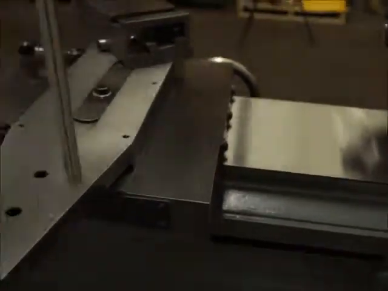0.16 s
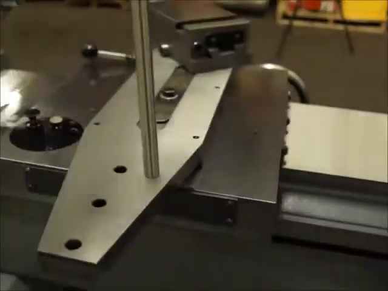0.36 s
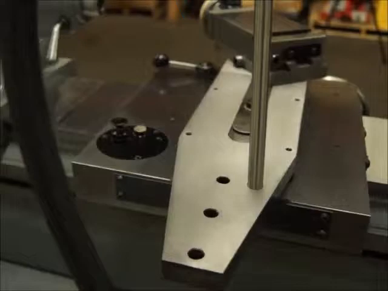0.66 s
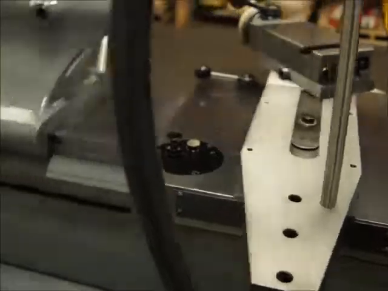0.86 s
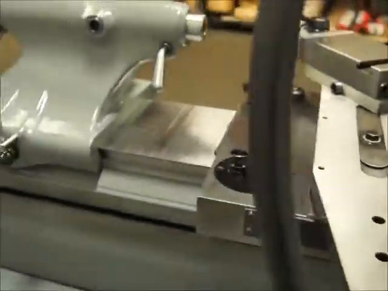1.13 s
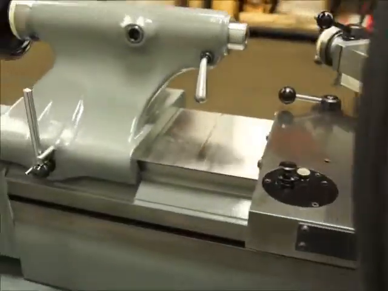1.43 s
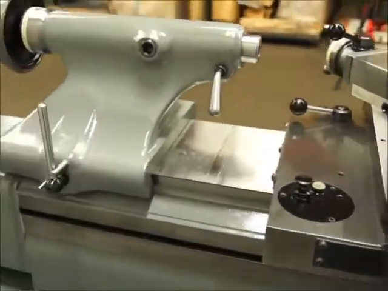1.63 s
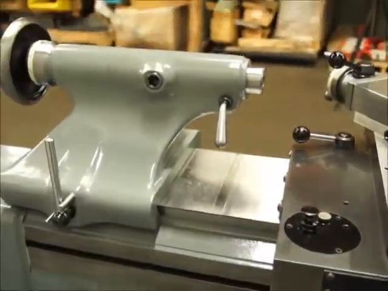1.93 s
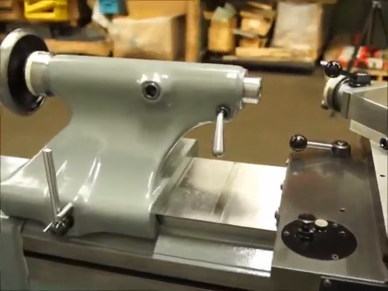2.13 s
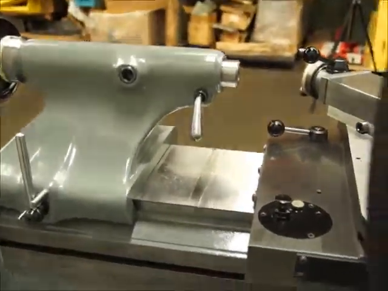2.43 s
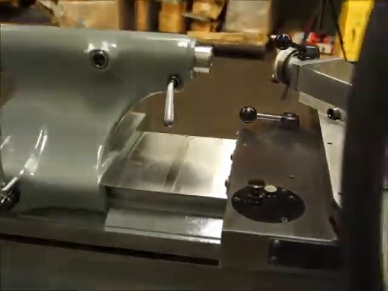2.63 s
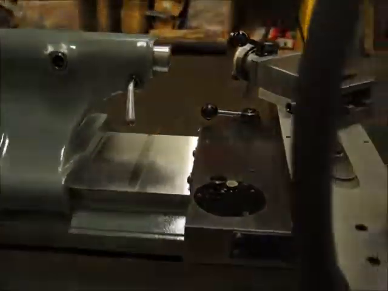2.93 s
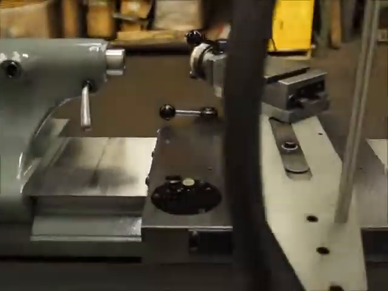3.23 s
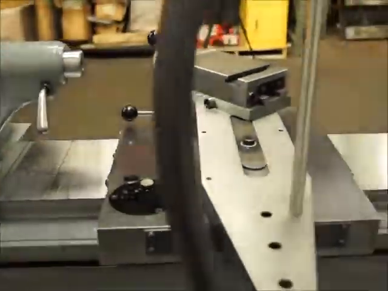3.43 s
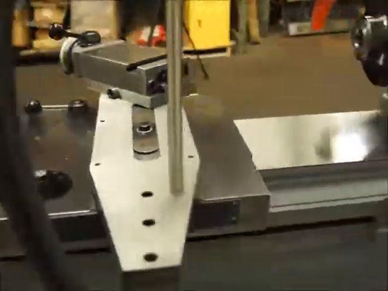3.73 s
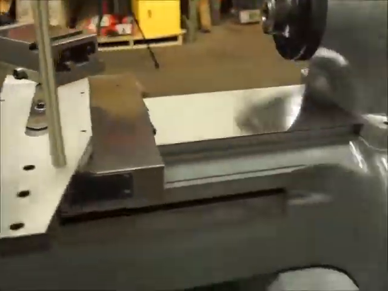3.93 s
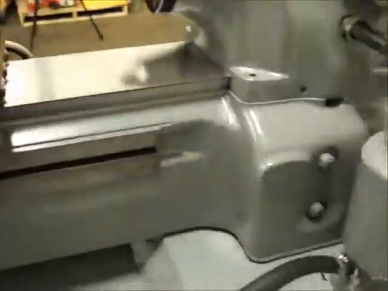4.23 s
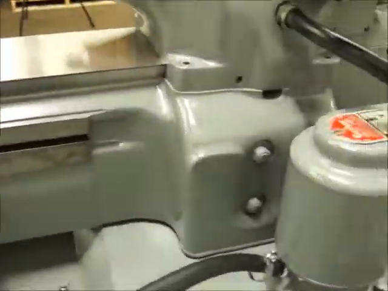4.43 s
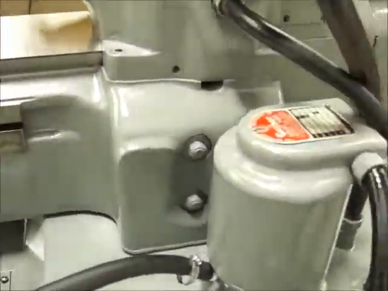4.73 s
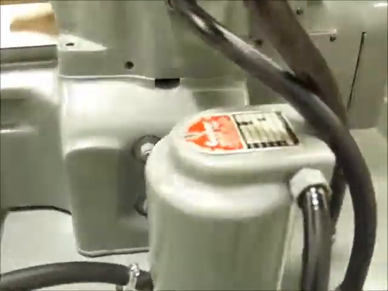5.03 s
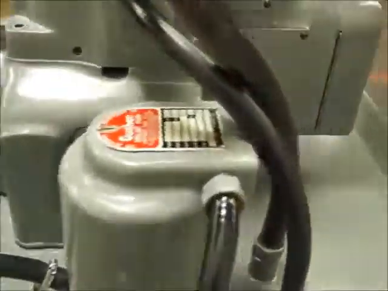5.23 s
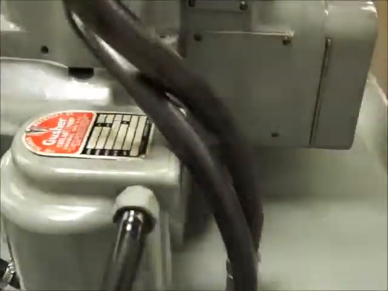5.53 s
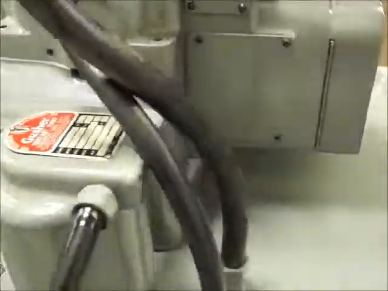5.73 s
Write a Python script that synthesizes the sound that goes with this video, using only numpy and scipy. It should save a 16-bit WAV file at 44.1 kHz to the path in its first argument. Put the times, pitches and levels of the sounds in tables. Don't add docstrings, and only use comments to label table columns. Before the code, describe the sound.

A metalworking lathe idles throughout, already running at the start and never changing speed. Thousands of tiny gear and bearing knocks fuse into a coarse, nasal whir centred near 1 kHz, with thinner cover-plate ringing above and a muffled motor rumble between about 150 and 800 Hz. It pulses subtly at fifteen shaft turns a second, with soft ticks on many turns. Steel clanks are scattered at 0-1.5 s, with brief housing swells near 0 and 0.6 s. From 1.5 to 3 s it is steadier and slightly quieter, with sharp clinks at 2.4 and 3.0 s and a faint high whine fading out. Clanks thicken from 3.6 s; around 4.5 s the level rises as the headstock nears, panels ringing briefly. From 5 to 5.9 s it is loudest and raspiest, with pump hum. The image leans right, then nearly centres. Short diffuse workshop reverberation; small camera microphone, treble cut above 11 kHz.

```python
import sys
import numpy as np
from scipy import signal
from scipy.fft import rfft, irfft, next_fast_len
from scipy.io import wavfile
from scipy.ndimage import uniform_filter1d, map_coordinates

SR = 44100
rng = np.random.default_rng(int(sys.argv[2]) if len(sys.argv) > 2 else 0)


def decibels_to_gain(level_db):
    exponent = np.asarray(level_db, float) / 20
    return 10 ** exponent


def dump_mix(stems):
    frames = np.atleast_2d(stems).T
    limited = np.clip(frames, -1, 1)
    pcm = np.round(limited * 32767).astype(np.int16)
    wavfile.write(sys.argv[1], SR, pcm)


N = 258867
SIZE = next_fast_len(N + SR)
HZ = np.maximum(np.fft.rfftfreq(SIZE, 1 / SR), 1)
T = np.arange(N) / SR

# [t/s, level of the lathe/dB, left minus right/dB]
CAMERA_PATH = [(0, -28.5, -4.5), (.3, -28, -4), (.45, -29.5, -4.5), (.6, -27, -4.2), (1.1, -28.5, -7),
               (1.8, -29.5, -4.5), (2.4, -28.5, -5), (2.75, -29, -4.5), (3.3, -29, -4), (3.62, -28, -3.5),
               (3.85, -28, -3.5), (4.2, -29, -2.5), (4.55, -25, -.8), (5.0, -26.5, -1), (5.4, -26, -1),
               (5.87, -24, -1)]
PLACE_S = [
    .9,
    3.2,
    4.5,
    5.15,
    5.75,
]
# [far level/dB, slope/dB per dB of approach, faced at t/s, faced for t/s, lift/dB]
PARTS = [
    (-35, 0.69, 0.11, 0.26, 5),
    (-32.5, 0.76, 4.33, .4, 1),
    (-33.5, 0.81, 5.77, 0.53, 2),
    (-42.5, 0.78, 0.12, 0.13, 1.5),
]
PART_HZ = [1000, 1600, 2900, 6000]
# [f/Hz, level/dB per Hz]
CASTING = [(260, -31), (450, -14.5), (890, -2.5), (1020, 1.5), (1150, -8), (1480, -8), (2040, -16.5),
           (2770, -15.5), (5640, -29), (6440, -25.5), (7170, -33), (8760, -33.5), (11000, -45),
           (14300, -110), (22000, -120)]
# [f/Hz, width/Hz, level
# over the casting/dB, place 0-4 aimed at, extra level there/dB]
LATHE_RINGS = [(873, 104, 2.1, 2.7, 6.5), (1013, 86, 8.5, 3.5, 6.5), (1218, 136, 1.7, 0.97, 4),
               (1364, 76, 4.5, .1, -5.5), (1400, 180, -3, 0.18, 6.5), (1510, 31, 3, 2.2, 4.5),
               (1664, 104, 0.5, 0.55, 2), (1818, 200, 0, 2.33, 6.5), (2130, 85, -0.4, 2.6, 6.5),
               (2398, 130, 3.5, 1.6, 2.5),
               (2620, 73, -0.5, 4.8, 6), (2742, 86, 2.5, 0.87, 3.5), (2980, 110, 1.9, 2.1, -2),
               (3395, 84, 3, 3.6, 5.5), (3850, 360, 2.1, 1.43, 3), (4480, 80, 3.2, 1.15, 8.5),
               (5180, 300, 4, 3.4, 6.5), (6340, 200, 5.5, 1.3, -3.5), (8370, 130, 4, 0.9, -5),
               (8540, 240, 4, 0.51, -3)]
# [f/Hz, level/dB per Hz]
RUMBLE = [(12, -58), (20, -50), (108, -18.5), (136, -13.5), (161, -10.5), (193, -10.5), (322, -3.5),
          (348, -1), (399, -5.5), (466, -2), (635, -4), (686, -6.5), (800, -4), (1040, -20), (1760, -120)]
# [multiple of the mesh rate, level/dB]
MESH = [(6, -48.5), (7, -68), (10, -45.5), (15, -46)]
# [f/Hz, level/dB]
HUM = [(73.6, -78), (105, -67.5), (168, -62.5), (242, -58), (335, -53.5), (475, -52.5)]
# [f/Hz, level/dB]
PUMP_HUM = [(73.6, -67.5), (560, -49)]
# [f/Hz, level/dB]
WHINE = [(4468, -53.5)]
# [f/Hz, level/dB per Hz]
PORTS = [(12, -46), (20, -18), (76, -6), (159, -1), (200, 9), (260, -30), (440, -120)]
# [t/s, peak level/dB, top minus peak/dB, body minus peak/dB]
CLANKS = [(0.021, -28, -4, -20), (0.2347, -27, -12, -1), (0.4367, -22, -14, -11), (0.535, -18.5, -16, -5.5),
          (1.0306, -21, -17, -17), (1.1523, -30, -17, -6), (1.4272, -18.5, -13.5, -10),
          (2.365, -15.5, -11.5, -26), (2.9691, -17, -27, -5), (3.191, -24, -22, -13),
          (3.293, -26, -24, -14), (3.6226, -23.5, -8.5, 0.5), (3.8927, -29, -9, 5.5),
          (3.967, -18, -27, -10), (4.018, -22.5, -13, -8), (4.157, -21, -14, -13), (4.4247, -26, -12, 4),
          (4.4912, -24, -11, -1), (4.557, -27, -12, -2), (4.8224, -29, -13, 1), (5.0958, -20, -16, -1.5),
          (5.2046, -27, -24, -5), (5.347, -17, -17, -11), (5.4144, -22, -14, -9), (5.4879, -18, -24, -12),
          (5.447, -24, -9, -4), (5.558, -19, -14, -8), (5.613, -19.5, -21, -7), (5.7536, -15, -23, -25)]
# [t/s, level/dB]
SURGES = [(.03, -26), (.12, -36), (.3, -35), (0.589, -24), (.65, -30), (1.91, -41), (2.21, -33),
          (2.43, -33), (2.68, -36), (2.89, -38), (3.11, -30.5), (3.371, -28.5), (3.47, -32), (3.61, -30.5),
          (3.74, -31), (4.04, -33), (4.67, -35), (4.76, -34.5), (4.84, -28.5), (4.95, -31), (5.25, -27),
          (5.31, -26.5), (5.405, -25.5), (5.5, -27), (5.62, -28), (5.69, -24), (5.765, -24), (5.787, -28.5),
          (5.83, -30.5)]
# [f/Hz, level/dB]
SHOP = [(60, -14), (250, -13.5), (600, -5.5), (880, -4), (1020, -10.5), (1200, -3), (2700, -5.5),
        (5000, -3.5), (10000, -1.5)]
# [t/s, for t/s, f/Hz, level/dB]
GLINTS = [(.95, .13, 4480, -47), (1.52, 0.17, 2404, -41.5), (3.62, 0.18, 2384, -38.5),
          (4.18, .1, 2950, -39), (4.3, .2, 1560, -33), (4.5, 0.15, 3310, -37), (4.55, 0.15, 2730, -37),
          (4.58, .22, 1760, -37), (5.25, 0.14, 2294, -37), (5.63, 0.18, 2620, -33), (5.7, 0.18, 803, -42)]

FAR_DB = -29
SHAFT_HZ, MESH_HZ = 15.0, 108.15
BEAM_PLACES = 0.73
SHADOW_S, SHADOW_FOR_S, SHADOW_DB = 4.5, 0.18, -2.5
RUMBLE_DB, PORTS_DB = -40.5, -66.5
TAP_START_S, TAP_HZ, TAP_SHARE = .034, 15.03, .6
TAP_DB, TAP_SCATTER_DB, TAP_TOP_DB, TAP_BODY_DB = -37, 2.5, -10, -3.5
TAP_NEAR_DB, PING_NEAR_DB = 5.5, -9
PING_HZ, PUMP_PING_HZ, HIGH_PING_HZ, PING_SPREAD = 4520, 4960, 6390, .007
SURGE_S, SURGE_HZ, SURGE_SPREAD = .011, 1021, .022
GLINT_Q = 15
SHOP_T60_S = 0.54
TOP_HZ = 11025


def level(x, db):
    return x * decibels_to_gain(db) / np.sqrt(np.mean(x ** 2))


def colour(points):
    hz, db = np.transpose(points)
    return decibels_to_gain(np.interp(np.log(HZ), np.log(hz), db))


def ring(hz, width):
    return 1 / np.sqrt(1 + ((HZ - hz) / (width / 2)) ** 2)


def shape(x, response):
    return irfft(rfft(x, SIZE) * response, SIZE)[..., :N]


def causal(gain):
    cep = irfft(np.log(gain + 1e-9), SIZE)
    cep[1:SIZE // 2] *= 2
    cep[SIZE // 2 + 1:] = 0
    return np.exp(rfft(cep))


def walk(rate_hz):
    k = int(SR / rate_hz)
    steps = np.repeat(rng.standard_normal(N // k + 1), k)
    return 1.301 * uniform_filter1d(uniform_filter1d(steps, k), k)[:N]


def nearness(place):
    return np.interp(T, PLACE_S, np.arange(len(PLACE_S)) == place)


def pump_side():
    return nearness(place=3) + nearness(place=4)


def headstock_share(s):
    return np.interp(s, PLACE_S[1:3], [0, 1])


def part_levels(near_db):
    out = []
    for db, slope, s, span, lift_db in PARTS:
        facing = np.exp(-((T - s) / span) ** 2)
        out.append(db + slope * near_db + lift_db * facing)
    out[0] = out[0] + SHADOW_DB * np.exp(-((T - SHADOW_S) / SHADOW_FOR_S) ** 2)
    return out


def knocks(rate, scatter_db, turn_db, patchy_db):
    angle = 2 * np.pi * SHAFT_HZ * T
    turn = np.cos(angle - 2.6) + 0.49 * np.cos(2 * angle - 5.2)
    hit = (rng.random(N) < rate / SR) * rng.standard_normal(N)
    hit = hit * decibels_to_gain(scatter_db * rng.exponential(size=N))
    depth = np.clip(1 + 0.69 * walk(4.77), 0, 2)
    return level(hit, 0) * decibels_to_gain(turn_db * turn * depth + patchy_db * walk(14))


def gears(part_db):
    heavy = knocks(6000., scatter_db=0.24, turn_db=0.4, patchy_db=.5)
    light = knocks(5000., scatter_db=0.9, turn_db=1.0, patchy_db=1.08)
    both = np.array([heavy, light])
    rings = LATHE_RINGS
    shapes = [ring(hz, width) ** 2 for hz, width, *_ in rings]
    body = 0
    for place in range(len(PLACE_S)):
        lift = 1
        for (_, _, db, aim, more_db), size in zip(rings, shapes):
            ring_db = db + more_db * np.exp(-((place - aim) / BEAM_PLACES) ** 2)
            lift = lift * (1 + (decibels_to_gain(ring_db) - 1) * size)
        body = body + nearness(place) * shape(both, causal(colour(CASTING) * lift))
    out = 0
    for k, (db, light_share) in enumerate(zip(part_db, [.04, .1, .25, .9])):
        band = np.interp(np.log(HZ), np.log(PART_HZ), np.arange(len(PART_HZ)) == k)
        mix = np.sqrt(1 - light_share) * body[0] + np.sqrt(light_share) * body[1]
        out = out + level(shape(mix, band), 0) * decibels_to_gain(db + .5 * walk(5.98))
    return out


def motor_rumble():
    noise = shape(rng.standard_normal(N), colour(RUMBLE))
    return level(noise, RUMBLE_DB) * decibels_to_gain(.5 * walk(2.85))


def tones(rows, waver_db, drift_hz):
    out = 0
    for hz, db in rows:
        phase = 2 * np.pi * (np.cumsum(hz + drift_hz * walk(5)) / SR + rng.random())
        skew = np.clip(hz / 390.0, 0, .9) * np.array([[.5], [-.5]])
        out = out + np.sqrt(2) * decibels_to_gain(db + waver_db * walk(2.86)) * np.sin(phase + skew)
    return out


def machine_tones():
    mesh = tones([(k * MESH_HZ, db) for k, db in MESH], waver_db=0.6, drift_hz=.15)
    hum = tones(HUM, waver_db=0.9, drift_hz=2.97)
    pump = pump_side() * tones(PUMP_HUM, waver_db=2.0, drift_hz=2.5)
    whine = nearness(place=0) * tones(WHINE, waver_db=0.5, drift_hz=12.)
    return mesh + hum + pump + whine


def port_air():
    return level(shape(rng.standard_normal((2, N)), colour(PORTS)), PORTS_DB)


def blows():
    turns = np.arange(TAP_START_S, N / SR, 1 / TAP_HZ)
    chance = rng.standard_normal((len(turns), 2))
    free = np.abs(turns[:, None] - np.transpose(CLANKS)[0]).min(axis=1) > .5 / TAP_HZ
    free &= rng.random(len(turns)) < TAP_SHARE
    taps = []
    for s, (late, size) in zip(turns[free], chance[free]):
        db = TAP_DB + TAP_NEAR_DB * headstock_share(s) + TAP_SCATTER_DB * size
        taps.append((s + .002 * late, db, TAP_TOP_DB, TAP_BODY_DB))
    return CLANKS + taps


def clanks():
    def band(noise, hz, q):
        x = signal.lfilter(*signal.iirpeak(hz, q, SR), noise)
        return x / x.std()

    out, t = np.zeros(N + SR), np.arange(SR // 10) / SR
    by_pump = pump_side()
    hump = ((t / 0.006) * np.exp(1 - t / 0.006)) ** 2
    for s, db, top_db, body_db in blows():
        noise = rng.standard_normal(len(t))
        near = headstock_share(s)
        low_hz = PING_HZ + (PUMP_PING_HZ - PING_HZ) * by_pump[int(s * SR)]
        low_hz = low_hz * (1 + PING_SPREAD * noise[-1])
        high_hz = HIGH_PING_HZ * (1 + PING_SPREAD * noise[-2])
        tick, thump = band(noise, 7600., 2.2), band(noise, 2200., .9)
        rasp = band(noise[::-1], low_hz * 1.1, 5.0)
        top = 1.46 * np.sin(2 * np.pi * high_hz * t) + 0.49 * tick
        ping = 0.56 * np.sin(2 * np.pi * low_hz * t) + (.12 + .23 * near) * rasp
        ping_gain = decibels_to_gain(0.22 * (db + 18.0) + PING_NEAR_DB * near)
        clank = ping_gain * ping + decibels_to_gain(top_db) * top + decibels_to_gain(body_db) * thump
        i = max(int((s - .002) * SR), 0)
        out[i:i + len(t)] += decibels_to_gain(db - 7.5) * hump * clank
    return out[:N]


def surges():
    out = np.zeros(N)
    for s, db in SURGES:
        off, phase = rng.standard_normal(2)
        swell = np.exp(-((T - s) / SURGE_S) ** 2)
        hz = SURGE_HZ * (1 + SURGE_SPREAD * off)
        out += np.sqrt(2) * decibels_to_gain(db) * swell * np.sin(2 * np.pi * hz * T + phase)
    return out


def shop(x):
    t, hop = np.arange(SR // 3) / SR, SR // 4
    fade = np.exp(-np.log(1000) * t / SHOP_T60_S) * (1 - np.exp(-t / 0.0012))
    window = np.sin(np.pi * np.arange(2 * hop) / (2 * hop))
    padded, wet = np.pad(x, (hop, 2 * hop), "wrap"), np.zeros((2, N + SR + SR))
    for i in range(0, N + hop, hop):
        tail = rng.standard_normal((2, len(t))) * fade / np.sqrt(np.sum(fade ** 2))
        piece = padded[i:i + 2 * hop] * window
        wet[:, i:i + 2 * hop + len(t) - 1] += signal.fftconvolve(piece[None], tail, axes=1)
    return shape(wet[:, hop:hop + N], colour(SHOP))


def glints():
    source = knocks(4000., scatter_db=1.2, turn_db=1.8, patchy_db=1.0)
    out = 0
    for s, span, hz, db in GLINTS:
        mode = level(shape(source, ring(hz, hz / GLINT_Q) ** 2), db)
        out = out + mode * np.exp(-((T - s) / span) ** 2)
    return out


def at_capsules(lathe, pan_db):
    tilt_db = np.array([pan_db, -pan_db]) / 2
    low = signal.lfilter(*signal.butter(1, 500., fs=SR), lathe)
    top = shape(lathe, colour([(5000, -27), (9000, -9.0)]))
    high = (lathe - low - top) * decibels_to_gain(1.52 * tilt_db)
    late = np.arange(N) + 0.31 * pan_db
    left = map_coordinates(low + high[0], [late], order=3, mode="nearest")
    return np.array([left, low + high[1]]) + top * decibels_to_gain(0.18 * tilt_db)


def scene():
    s, *columns = np.transpose(CAMERA_PATH)
    heard_db, pan_db = (np.interp(T, s, c) for c in columns)
    lathe = gears(part_levels(heard_db - FAR_DB)) * decibels_to_gain(-2.0) + clanks() + surges() + glints()
    rumble = motor_rumble()
    direct = at_capsules(lathe, pan_db) + rumble
    return direct + shop(lathe + rumble) + machine_tones() + port_air()


def roll_off(x):
    return signal.sosfilt(signal.butter(12, 11110, fs=SR, output="sos"), x)


def record(dry):
    mid, side = (dry[0] + dry[1]) / 2, (dry[0] - dry[1]) / 2
    dip, top = ring(393.8, 103.0) ** 2, HZ < TOP_HZ
    mid = shape(mid, (1 - 0.87 * dip) * top)
    side = shape(side, (1 - .45 * dip) * top)
    return roll_off(np.array([mid + side, mid - side]))


dry = scene()
out = record(dry)
dump_mix(out)
```